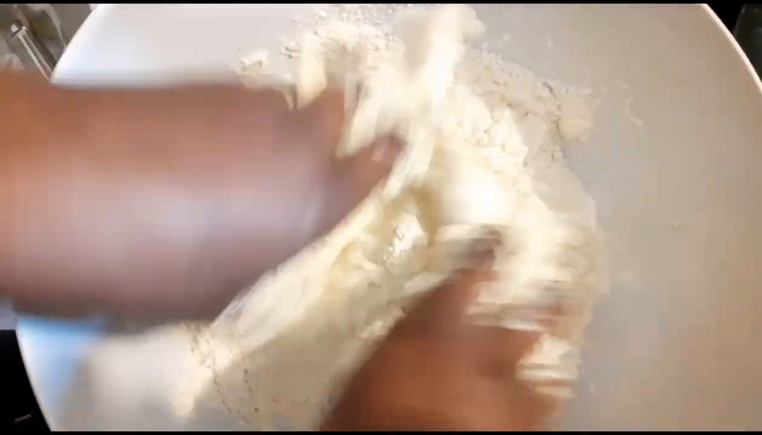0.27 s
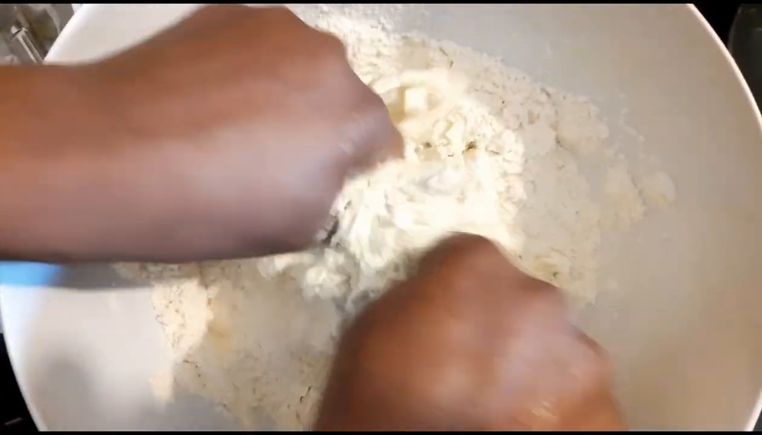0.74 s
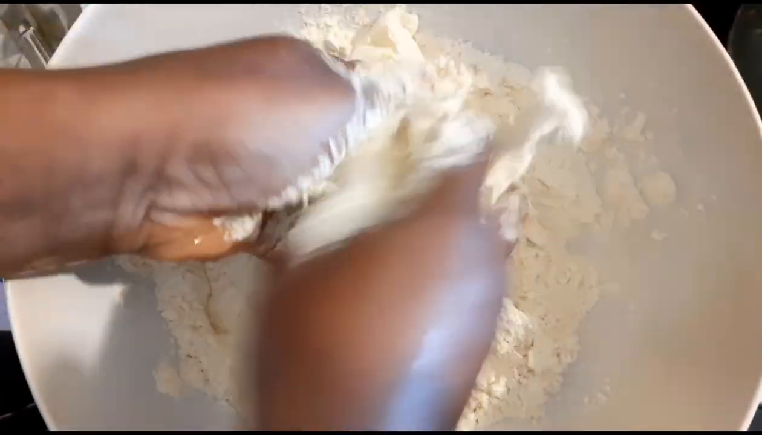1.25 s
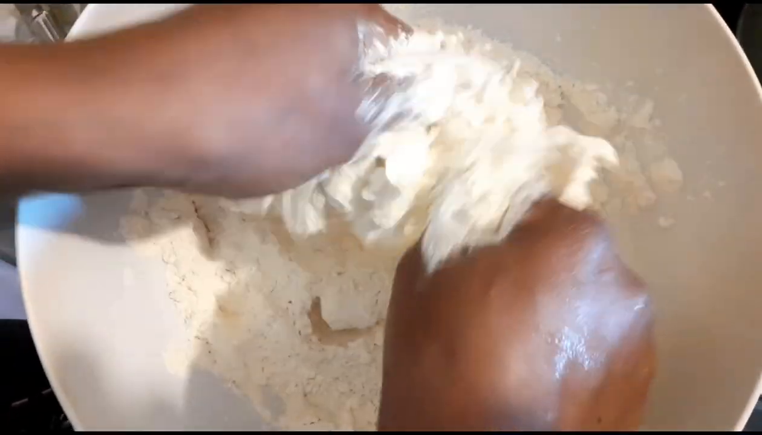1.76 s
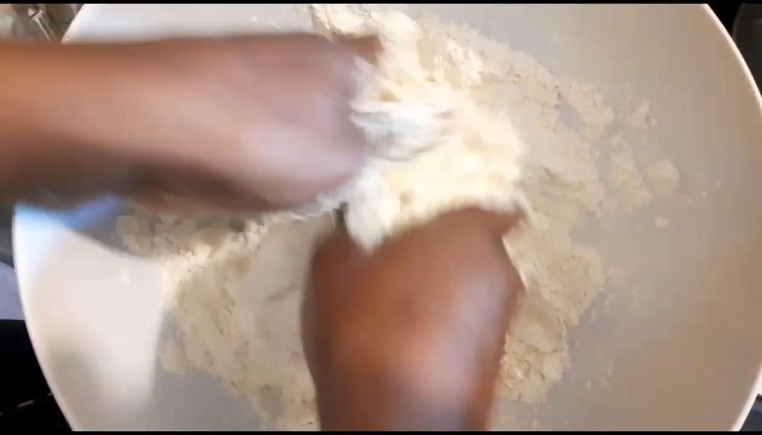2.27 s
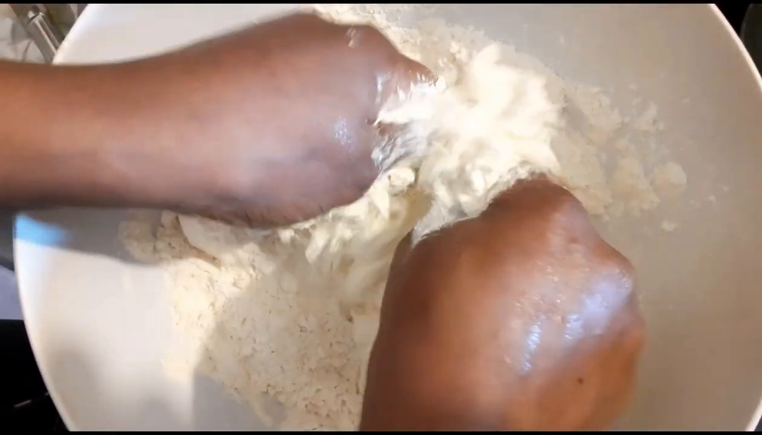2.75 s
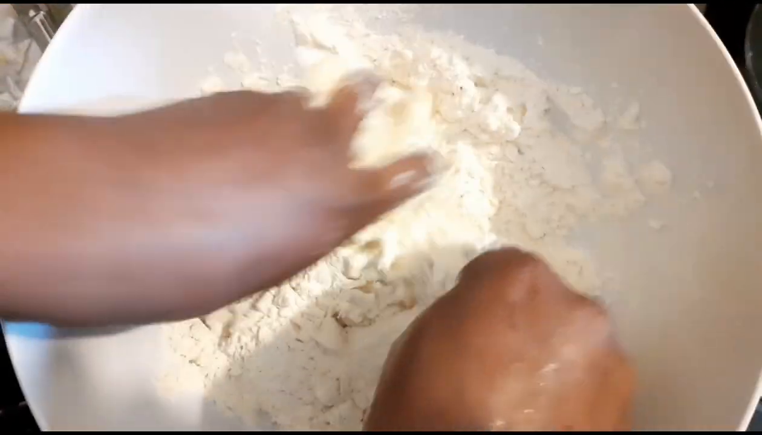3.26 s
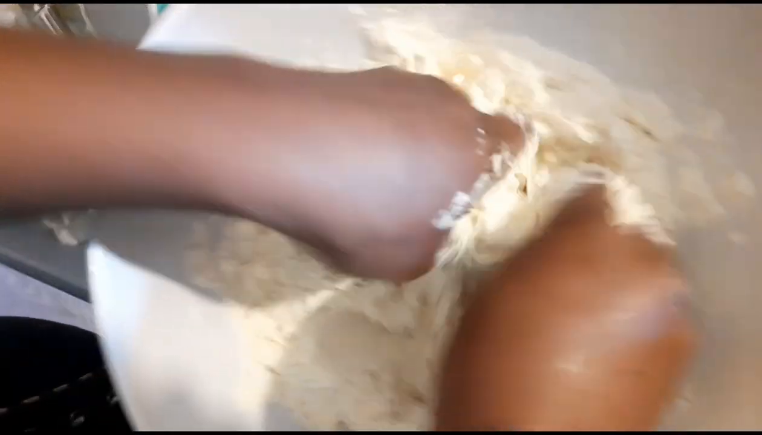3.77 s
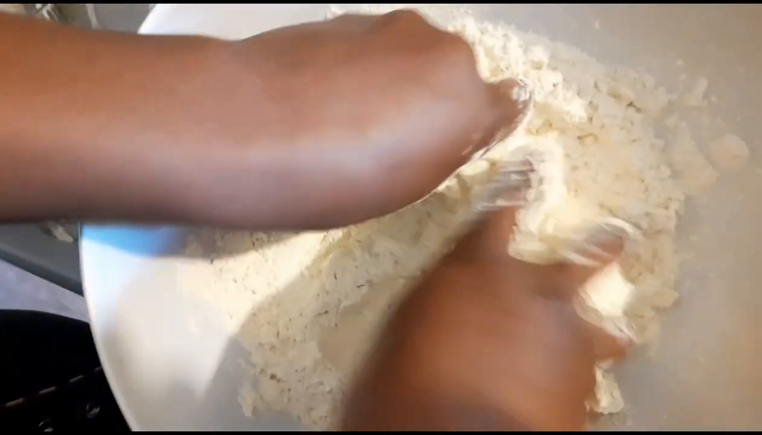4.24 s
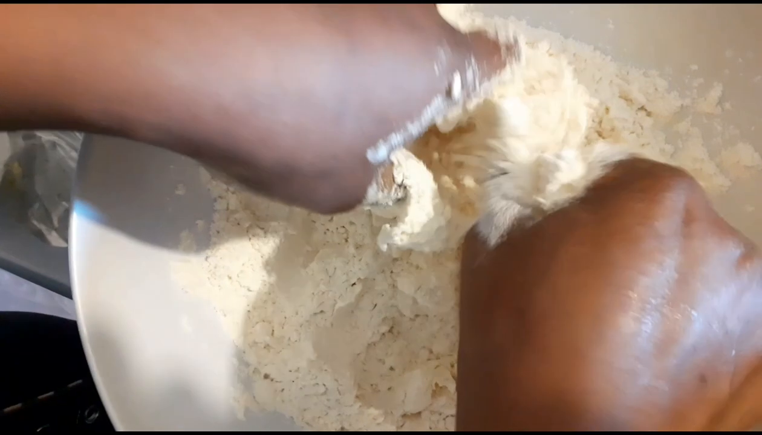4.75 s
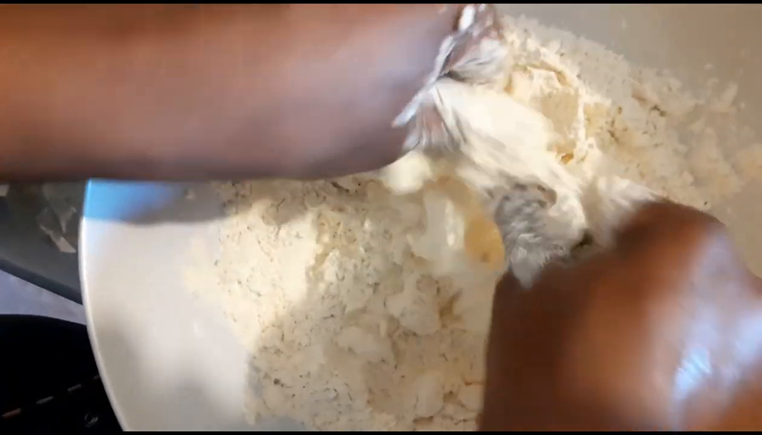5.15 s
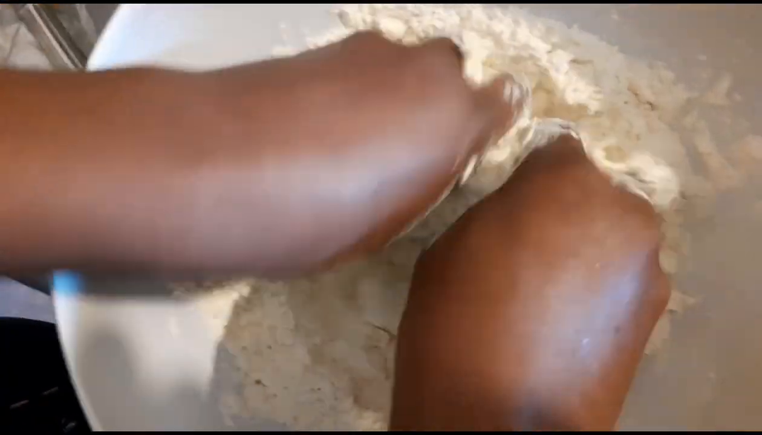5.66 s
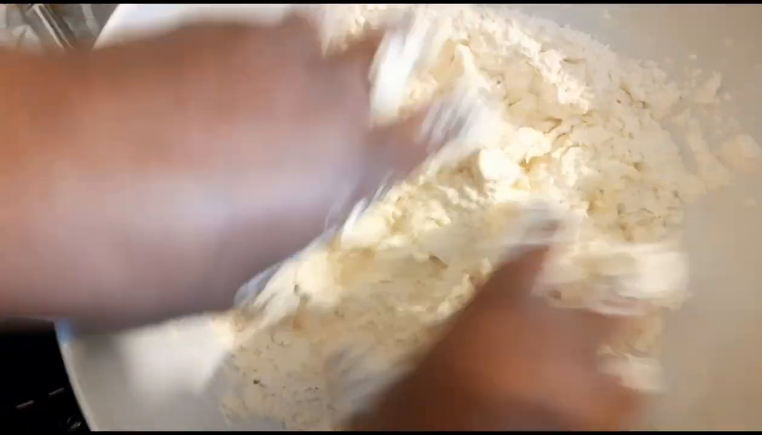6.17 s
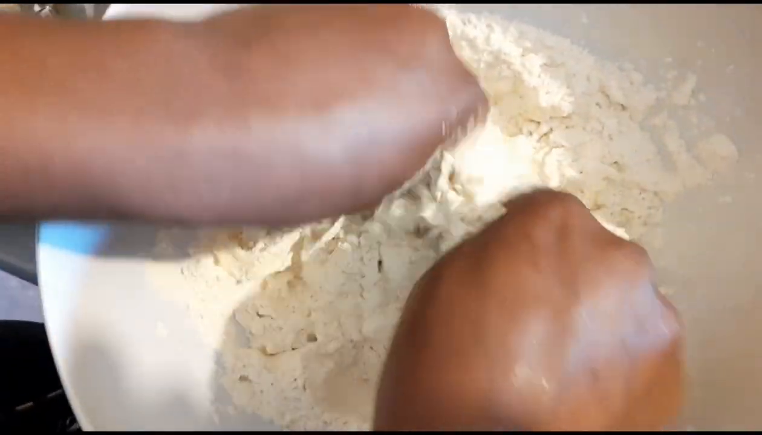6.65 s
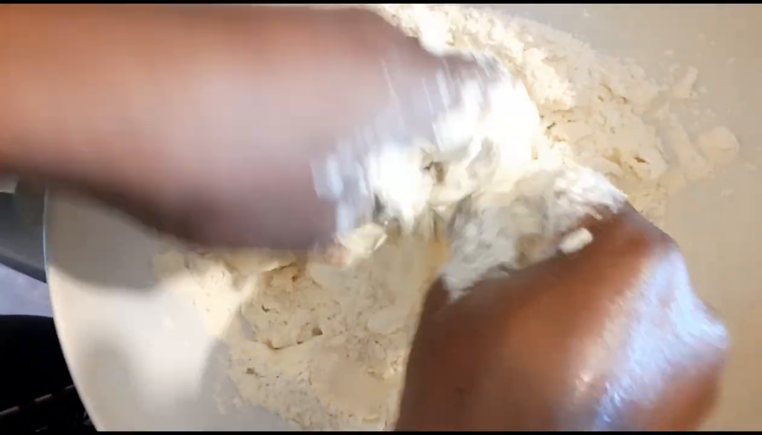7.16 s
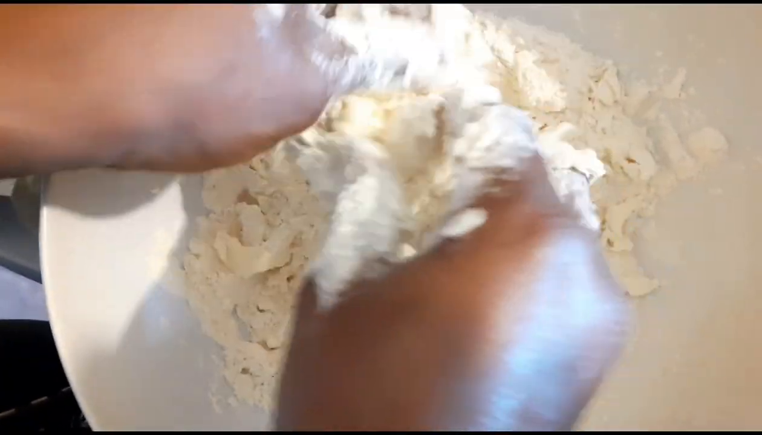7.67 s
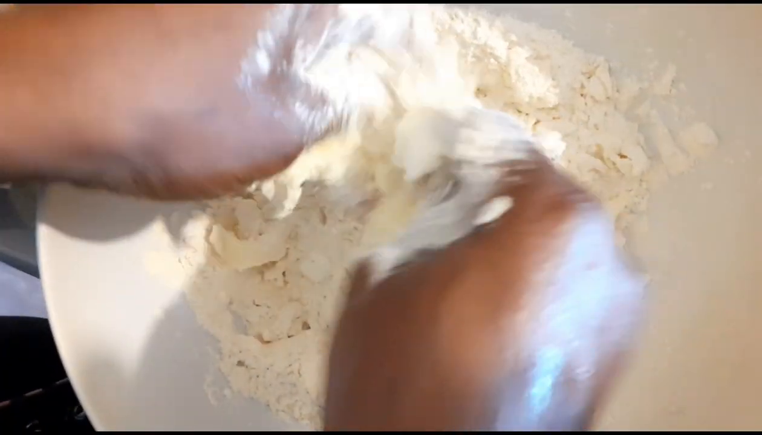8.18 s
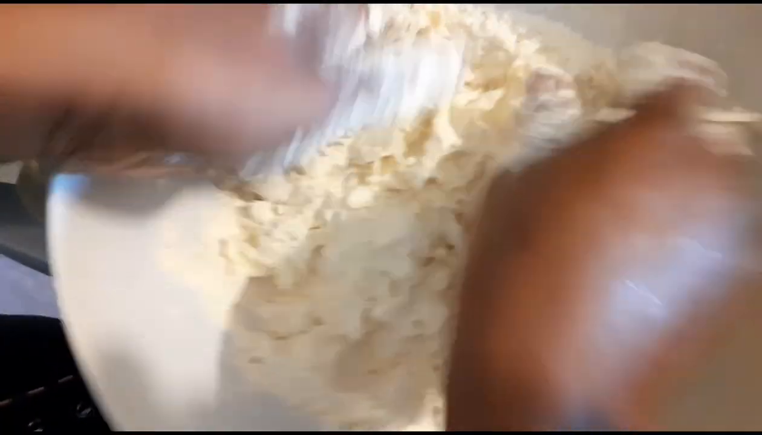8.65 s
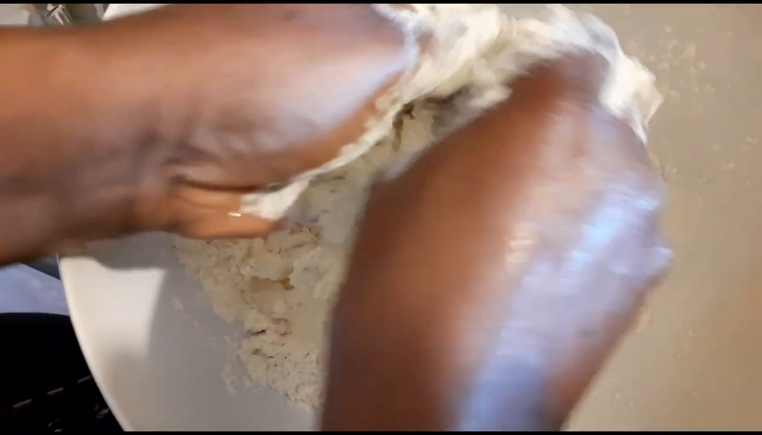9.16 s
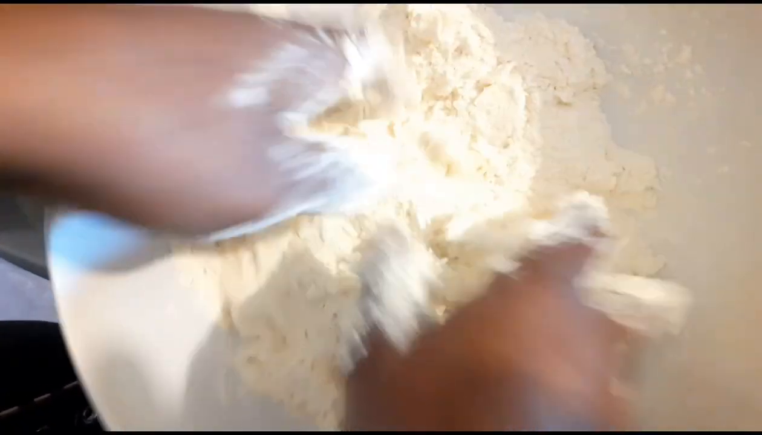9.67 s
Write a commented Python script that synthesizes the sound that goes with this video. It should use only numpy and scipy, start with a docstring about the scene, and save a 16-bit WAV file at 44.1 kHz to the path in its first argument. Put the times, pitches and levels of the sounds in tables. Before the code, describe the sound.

Hands work fat into flour in a big, heavy bowl. The first few seconds are mostly soft squashes, gritty rubbing and low pats; then pushes rock the bowl, giving dull thuds and bright clacks in uneven clusters, with short pauses between. Close stereo microphone in a small, live kitchen, over faint appliance hum and hiss.

```python
"""Dull thuds and bright clacks of a heavy bowl on a counter, with dough squashed and rubbed by two hands between them.
Each push rocks the bowl: struck modes and shaped noise make its foot's thuds and the clacks of its hard edge.
Swelling noise and tiny snaps make the strokes; low puffs make the pats and slumps; dry ticks are flicked crumbs.
A small room answers with changing echoes, over a faint hum and hiss of filtered noise."""
import sys
import numpy as np
from scipy import signal
from scipy.fft import rfft, irfft
from scipy.io import wavfile
from scipy.ndimage import uniform_filter1d

SR = 44100
rng = np.random.default_rng(int(sys.argv[2]) if len(sys.argv) > 2 else 0)


def transcribe(signal):
    """Save signal, clipped to [-1, 1], as a 16-bit WAV file at the path in sys.argv[1]."""
    frames = np.atleast_2d(signal).T
    limited = np.clip(frames, -1, 1)
    pcm = np.round(limited * 32767).astype(np.int16)
    wavfile.write(sys.argv[1], SR, pcm)


N = 437472
RING_T = np.arange(SR // 5) / SR  # time axis of one short sound, s

# spectrum of dough giving way: (f/Hz, relative level/dB)
SQUASH_SPECTRUM = [(25, -20), (65, -10), (105, -2.5), (140, -3.5), (230, -2.5), (320, -2.5), (500, -8),
                   (800, -38.5), (1600, -35.5), (5000, -78.5)]


def gain_of(db):
    """Turns decibels into an amplitude factor."""
    return 10 ** (np.asarray(db) / 20)


def evened(x):
    """Scales a sound to unit rms."""
    return x / np.sqrt(np.mean(x ** 2) + 1e-20)


def read(points, hz):
    """Reads a table's value along log frequency."""
    f, value = np.transpose(points)
    return np.interp(np.log(hz + 1), np.log(f + 1), value)


def add(mix, s, sound):
    """Lays a stereo sound into the mix at time s."""
    part = mix[:, max(round(s * SR), 0):][:, :sound.shape[1]]
    part += sound[:, :part.shape[1]]


def coloured(x, points):
    """Filters a sound by the level curve of a table."""
    size = x.shape[-1]
    gain = gain_of(read(points, np.fft.rfftfreq(size, 1 / SR)))
    return irfft(rfft(x) * gain, size)


def diffuse(size):
    """Noise from all sides: alike at both microphones in the bass, mostly unrelated in the treble."""
    # likeness of the two microphones in a diffuse field: (f/Hz, correlation, 1 = identical)
    likeness = [(60, 0.97), (200, 1), (400, 0.82), (700, 0.46), (1400, 0), (16000, 0.16)]
    left, other = rfft(rng.standard_normal((2, size)))
    same = np.clip(read(likeness, np.fft.rfftfreq(size, 1 / SR)), -1, 1)
    right = same * left + np.sqrt(1 - same ** 2) * other
    return irfft(np.array([left, right]), size)


def wander(per_s):
    """A random curve of unit rms: straight lines between per_s random points a second."""
    knots = np.arange(N) / SR * per_s
    return evened(np.interp(knots, np.arange(N), rng.standard_normal(N)))


def filtered(x, hz, kind, order):
    """A causal low-pass or high-pass."""
    b, a = signal.butter(order, np.clip(hz, 30, SR * .45), kind, fs=SR)
    return signal.lfilter(b, a, x)


def at_peak(x, db):
    """Sets the rms level of a sound's loudest 4 ms."""
    loudest = uniform_filter1d((x ** 2).mean(0), size=176).max()
    return x * gain_of(db) / np.sqrt(loudest)


def air(level_db=-54, waver_db=0.72, waver_per_s=17):
    """Hiss with the narrow humming bands of a distant appliance, wavering slightly in level."""
    # background spectrum: (f/Hz, relative level/dB)
    air_spectrum = [(18, -50.5), (30, -7), (102, -10), (249, -5), (270, -0.5), (332, 1), (591, -11),
                    (874, -9.5), (1330, -1.5), (1440, 2), (2180, -15), (3320, -13), (10200, -19.5),
                    (11900, -11.5), (15500, -14.5)]
    # stereo tilt of the background: (f/Hz, left minus right/dB)
    air_balance = [(60, -17.5), (300, -1), (650, -5), (1200, 2.5), (2500, -1), (3200, -0.5), (15000, 3)]
    # humming bands raised above the hiss: (centre f/Hz, width/Hz, height/dB)
    hum_bands = [(331.5, 91, 0.5), (1180, 160, 5.3), (1410, 14, 2.6), (3330, 530, 3.5), (4000, 490, 6.1),
                 (4940, 350, 3.8), (8130, 210, 11), (9120, 330, 7), (11780, 130, 12)]
    hz = np.fft.rfftfreq(N, 1 / SR)
    db = read(air_spectrum, hz)
    for f, width, height in hum_bands:
        db = db + height / (1 + (2 * (hz - f) / width) ** 2)
    db = db + np.array([[.5], [-.5]]) * read(air_balance, hz)
    hiss = evened(irfft(rfft(diffuse(N)) * gain_of(db), N))
    return hiss * gain_of(level_db + waver_db * wander(waver_per_s))


def dough(squash_trim_db=-2, rub_trim_db=-3):
    """Each stroke squashes lumps that give way unevenly, drags fine flour over the wall and breaks tiny lumps."""
    # hand strokes: (middle t/s, standard deviation of the swell/s,
    # squash level/dB before trim, rub level/dB before trim)
    strokes = [(0.096, 0.025, -43.5, -60), (0.373, 0.07, -53, -56.5), (0.442, 0.021, -55, -45),
               (0.797, 0.012, -53, -58), (1.01, 0.059, -54.5, -52.5), (1.309, 0.013, -53, -57),
               (2.19, 0.058, -64, -51), (3.201, 0.062, -42.5, -46), (3.73, 0.12, -39, -47.5),
               (4.594, 0.0317, -36, -63), (5.364, 0.016, -39, -56.5), (5.588, 0.02, -45.5, -38.5),
               (6.316, 0.076, -50, -49.5), (8.43, 0.024, -42, -52), (8.679, 0.058, -42, -48),
               (9.653, 0.031, -46.5, -51)]
    # spectrum of flour rubbing on the wall: (f/Hz, relative level/dB)
    rub_spectrum = [(60, -16.5), (300, -3), (700, 5.5), (1300, 1.5), (2300, -2), (4500, -9.5), (8000, -8.5),
                    (16000, -18)]
    # between strokes the fingers keep working faintly
    idle_squash_db, idle_rub_db, idle_sway_db = -65.5, -69, 3.5
    # tiny lumps break under the fingers; their level is relative to the rubbing grains
    crackle_per_s, crackle_spread_db, crackle_db = 930, 3.5, -8.5

    t = np.arange(N) / SR
    sway = idle_sway_db * wander(per_s=7)
    push, drag = gain_of(idle_squash_db + sway), gain_of(idle_rub_db + sway)
    for s, spread, squash_db, rub_db in strokes:
        swell = np.exp(-np.minimum(((t - s) / spread) ** 2, 50) / 2)
        push = push + gain_of(squash_db + squash_trim_db) * swell
        drag = drag + gain_of(rub_db + rub_trim_db) * swell

    uneven_squash = diffuse(N) * gain_of(3.5 * wander(per_s=90))
    lumps = evened(coloured(uneven_squash, SQUASH_SPECTRUM))
    uneven_rub = diffuse(N) * gain_of(3.2 * wander(per_s=350))
    grains = evened(coloured(uneven_rub, rub_spectrum))

    snap_sizes = gain_of(crackle_spread_db * np.minimum(rng.exponential(1, N), 4))
    snaps = (rng.random(N) < crackle_per_s / SR) * snap_sizes
    crackle = evened(coloured(snaps * rng.standard_normal((2, N)), rub_spectrum))
    return push * lumps + drag * (grains + gain_of(crackle_db) * crackle)


def bowl(crack_db, crack_t60, scatter_hz=1500, onset_s=0.000083):
    """One blow: low modes move the whole bowl alike; high ones vary with the spot struck and the side heard."""
    # modes of the bowl with its load of dough:
    # (f/Hz, relative amplitude with the sign of the wall facing the microphone, t60/s)
    bowl_modes = [(148, -.06, .14), (215, .06, .1), (300, .26, .084), (363, -.34, .09), (467, -.26, .029),
                  (540, -.07, .09), (644, .7, .009), (765, .04, .05), (975, .14, .028), (1075, -.25, .009),
                  (1170, .05, .05), (1410, -.12, .025), (1670, .08, .032), (1980, .07, .028),
                  (2200, -.1, .026), (2690, .035, .035), (2990, -.03, .03), (3480, .03, .02),
                  (3900, -.026, .032), (4335, .018, .032), (5470, -.016, .022), (5960, .016, .022),
                  (6980, -.016, .02)]
    # spectrum of the noise that stands for the dense upper modes: (f/Hz, relative level/dB)
    crack_spectrum = [(300, -35.5), (1000, -11), (2200, 2.5), (4000, -3), (7000, -9.5), (11000, -13.5),
                      (16000, -18)]
    rings = np.array([height * np.exp(2j * np.pi * hz * RING_T) * gain_of(-60 * RING_T / t60)
                      for hz, height, t60 in bowl_modes])
    # random phases, wider for higher modes and separate for each side
    scatter = np.minimum((np.array(bowl_modes)[:, 0] / scatter_hz) ** 2, np.pi)
    phases = scatter * rng.standard_normal((2, len(bowl_modes)))
    modes = (np.exp(1j * phases) @ rings).imag
    crack = evened(coloured(rng.standard_normal((2, len(RING_T))), crack_spectrum))
    crack = crack * np.exp(-np.log(1000) * RING_T / crack_t60)
    return (modes + gain_of(crack_db) * crack) * (1 - np.exp(-RING_T / onset_s))


def puff(rise_s=0.011, low_hz=105):
    """Dough settles with a low, dull puff: squash noise that swells and fades."""
    noise = filtered(coloured(diffuse(len(RING_T)), SQUASH_SPECTRUM), low_hz, "high", order=1)
    return noise * (RING_T / rise_s) ** 2 * np.exp(-RING_T / rise_s)


def thuds(trim_db=-5, touch_db=-15, thin_hz=1050, touch_top_hz=1900):
    """The foot lands: the dough cushions it, so softer landings ring fewer high modes; then the load slumps."""
    # landings of the bowl's foot: (t/s, force as relative level/dB)
    landings = [(0.05, -28), (0.102, -23), (2.618, -23), (2.831, -5), (2.848, -19), (3.235, -25),
                (3.619, -17.5), (3.775, -15), (3.789, -19.5), (3.8039, -18), (3.903, -10), (4.015, 0),
                (4.031, -10), (4.525, -19), (5.263, -22.5), (5.318, -25), (5.572, -5), (6.3, -0.5),
                (6.78, -4.5), (8.624, -26), (8.673, -17), (8.725, -14.5), (8.798, -20), (9.67, -6),
                (9.731, -4)]
    # a harder landing packs the dough and sounds brighter: low-pass of a 0 dB landing,
    # and the drop in level that halves it
    top_at_0_db_hz, dulling_db_per_octave = 1970, 12
    # level of the slump after a 0 dB landing, and its change in dB per dB of landing
    slump_db, slump_growth = -17.5, 0.68
    out = np.zeros((2, N))
    for s, db in landings:
        top_hz = top_at_0_db_hz * 2 ** (db / dulling_db_per_octave)
        blow = filtered(bowl(crack_db=-11.5, crack_t60=0.01), top_hz, "low", order=2)
        add(out, s, at_peak(blow, db + trim_db))
        # the foot does not land flat: a lighter, thinner touch follows
        touch = filtered(bowl(crack_db=-9, crack_t60=0.0078), touch_top_hz, "low", order=3)
        touch = filtered(touch, thin_hz, "high", order=2)
        add(out, s + rng.uniform(0.00201, 0.0074), at_peak(touch, db + touch_db))
        add(out, s, at_peak(puff(), slump_db + slump_growth * db))
    return out


def pats(trim_db=-2, top_hz=150):
    """Soft blows of the palm that do not move the bowl: the dough swallows all but the bass."""
    # hand pats: (t/s, peak level/dB before trim)
    palm_blows = [(0.901, -31.5), (0.978, -40.5), (2.061, -41), (2.153, -33.5)]
    out = np.zeros((2, N))
    for s, db in palm_blows:
        pat = filtered(puff(rise_s=0.0075), top_hz, "low", order=2)
        add(out, s, at_peak(pat, db + trim_db))
    return out


def clack(treble_db, thin_hz=1900, body_db=-14, corner_hz=2400):
    """A brief hard contact near the edge rings the high modes and hardly moves the load."""
    ring = bowl(crack_db=-22.5, crack_t60=0.036)
    ring = filtered(ring, thin_hz, "high", order=2) + gain_of(body_db) * ring
    dull = filtered(ring, corner_hz, "low", order=2)
    return dull + gain_of(treble_db) * (ring - dull)


def clacks(trim_db=-5, treble_trim_db=-2, chatter_s=.009, chatter_db=-13.5):
    """The hard edge strikes, with a landing, after it or alone, then chatters once, more softly."""
    # edge strikes: (t/s, peak level/dB before trim, treble level/dB before trim)
    edge_strikes = [(2.8497, -18.5, -2.5), (3.234, -27, -5.5), (3.619, -24, -13.5), (3.8633, -6.5, -1),
                    (3.934, -10.5, -8.5), (4.04, -7.5, -10.5), (4.601, -21, -3.5), (5.3619, -20.5, -7),
                    (5.648, -5.5, -2), (5.69, -26, -16), (6.333, -13.5, -3.5), (6.7986, -20.5, 7.5),
                    (8.413, -27.5, -9.5), (8.6745, -20, -18), (8.7152, -12, -3.5), (8.736, -22, 1),
                    (9.6876, -25, -0.5), (9.7529, -16.5, 3)]
    out = np.zeros((2, N))
    for s, db, bright_db in edge_strikes:
        treble_db = bright_db + treble_trim_db
        add(out, s, at_peak(clack(treble_db), db + trim_db))
        chatter_at = s + chatter_s * rng.uniform(0.6, 1.3)
        add(out, chatter_at, at_peak(clack(treble_db), db + trim_db + chatter_db))
    return out


def crumbs(trim_db=-3, fade_s=.0009):
    """Crumbs flick the wall, too light to ring the bowl: each dry tick has its own level and thinness."""
    # flicked crumbs: (t/s, peak level/dB before trim, high-pass f/Hz)
    flicks = [(4.769, -57, 3000), (8.1268, -29.5, 1830), (9.533, -34, 4480)]
    out = np.zeros((2, N))
    for s, db, thin_hz in flicks:
        tick = rng.standard_normal((2, len(RING_T))) * np.exp(-RING_T / fade_s)
        add(out, s, at_peak(filtered(tick, thin_hz, "high", order=2), db + trim_db))
    return out


def room_tail(build_s=0.004):
    """Echoes build up within some milliseconds; the bass lingers longest."""
    # decay of the room: (f/Hz, t60/s)
    room_decay = [(80, .65), (170, .55), (250, .6), (350, .46), (700, .42), (1500, .36), (2300, .33),
                  (4000, .38), (12000, .3)]
    # colour of the echoes: (f/Hz, relative level/dB)
    echo_colour = [(40, -18), (110, 1.5), (180, -13), (260, 5), (360, -11.5), (700, -3.5), (1500, -2.5),
                   (2300, -5.5), (4000, -3.5), (12000, -4.5)]
    hz, t, z = signal.stft(coloured(diffuse(SR), echo_colour), SR, nperseg=512)
    t60 = np.maximum(read(room_decay, hz), .05)[:, None]
    level = np.sqrt(2 * np.log(1000) / (t60 * SR))  # long and short decays carry equal energy
    z = z * np.exp(-np.log(1000) * t / t60) * level
    tail = signal.istft(z, SR, nperseg=512)[1][:, :SR]
    return tail * (1 - np.exp(-(np.arange(SR) / SR / build_s) ** 2))


def kitchen(x, wet_db=-1, count=3, cycle_s=3.7):
    """The arms move over the bowl's mouth, so the echoes keep changing: several tails trade places in a cycle."""
    turn = 2 * np.pi * np.arange(N) / SR / cycle_s
    echoes = np.zeros((2, N))
    for k in range(count):
        share = np.sqrt(2 / count) * np.cos(turn + np.pi * k / count)  # total power stays constant
        echoes += signal.fftconvolve(x * share, room_tail(), axes=1)[:, :N]
    return gain_of(wet_db) * echoes


def microphone(x, low_cut_hz=48, lag_s=.00009):
    """The sound reaches the left port first; each port has its own colour, and both lose the deepest bass."""
    # colour of the two ports: (f/Hz, left minus right/dB)
    port_balance = [(300, 0), (600, 3), (1000, -2.5), (1600, -3), (2400, -4.5), (3500, -2.5), (8000, 0),
                    (14000, 4)]
    hz = np.fft.rfftfreq(N, 1 / SR)
    sides = np.array([[.5], [-.5]])
    ports = gain_of(sides * read(port_balance, hz)) * np.exp(2j * np.pi * hz * sides * lag_s)
    return filtered(irfft(rfft(x) * ports, N), low_cut_hz, "high", order=2)


def scene():
    """Bowl and dough in the kitchen, over the background air."""
    near = dough() + thuds() + pats() + clacks() + crumbs()
    return microphone(near + kitchen(near) + air())


def record(dry, threshold_db=-26, share=0.14, recover_db_per_s=9, attack_s=0.28, edge_hz=15800):
    """Gain control dips after loud knocks by a share of their excess and creeps back; then the band limit."""
    power_db = 10 * np.log10(abs(uniform_filter1d((dry ** 2).mean(0), size=400)) + 1e-12)
    # hold each peak and let it fall at a steady rate
    fall = np.arange(N) * recover_db_per_s / SR
    held_db = np.maximum.accumulate(power_db + fall) - fall
    over_db = np.maximum(held_db - threshold_db, 0)
    keep = np.exp(-1 / (attack_s * SR))
    dip_db = share * signal.lfilter([1 - keep], [1, -keep], over_db)
    ducked = np.clip(dry / gain_of(dip_db), -1, 1)
    low_pass = signal.firwin(511, edge_hz, window=("kaiser", 9), fs=SR)
    return signal.oaconvolve(ducked, low_pass[None], "same")


dry = scene()
out = record(dry)
transcribe(out)
```